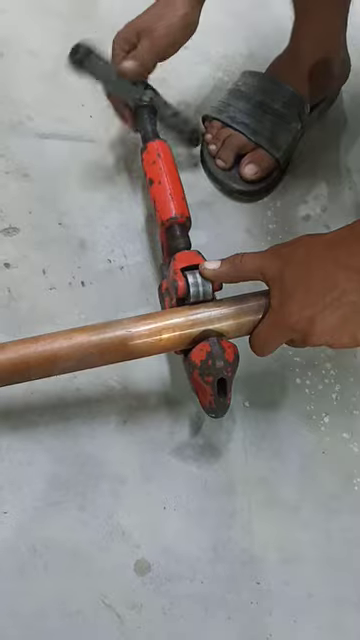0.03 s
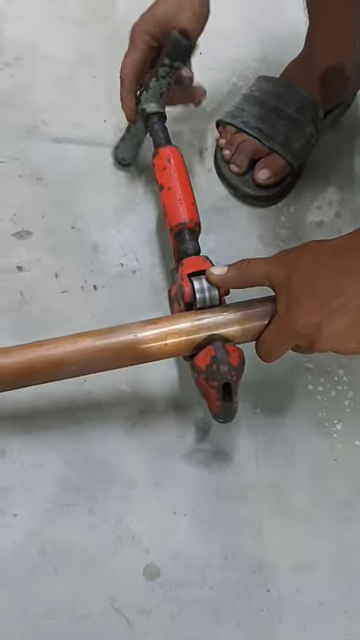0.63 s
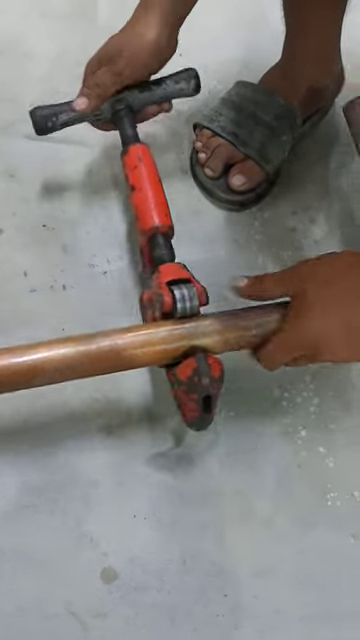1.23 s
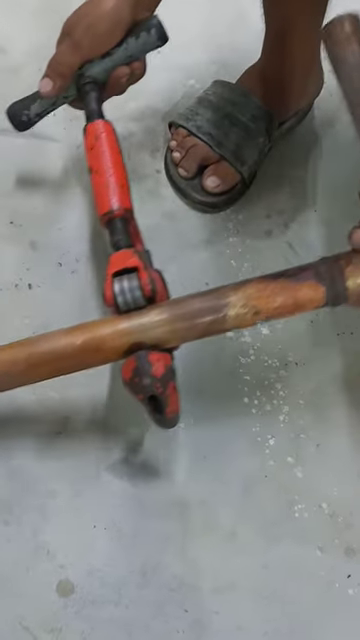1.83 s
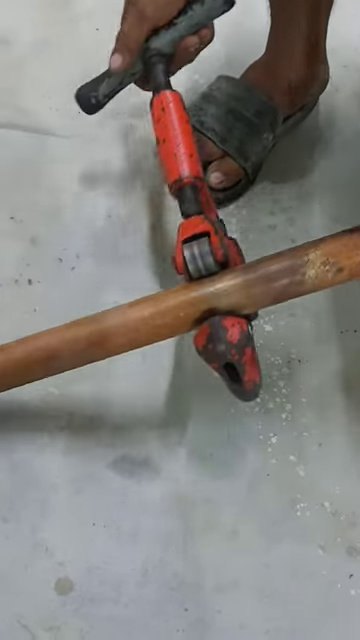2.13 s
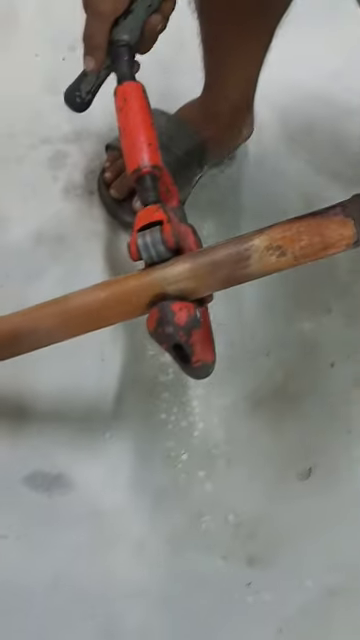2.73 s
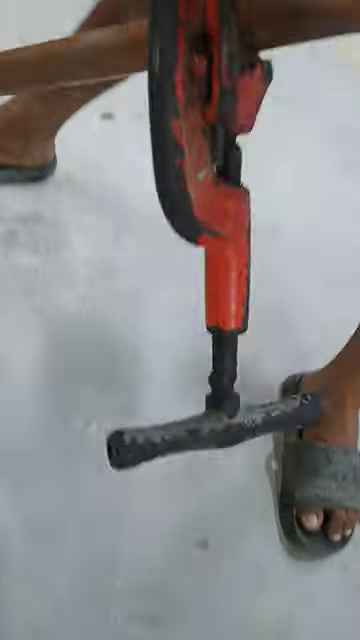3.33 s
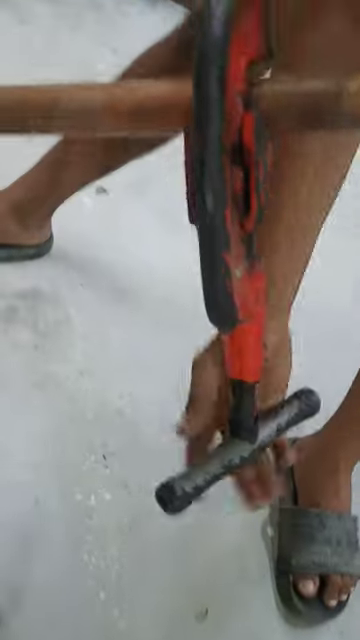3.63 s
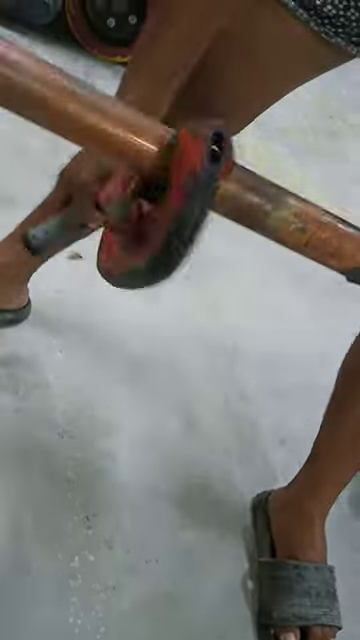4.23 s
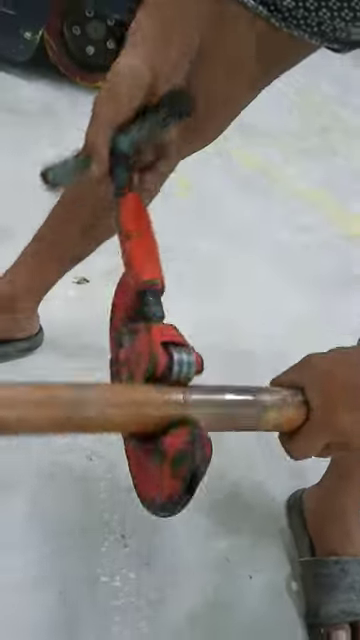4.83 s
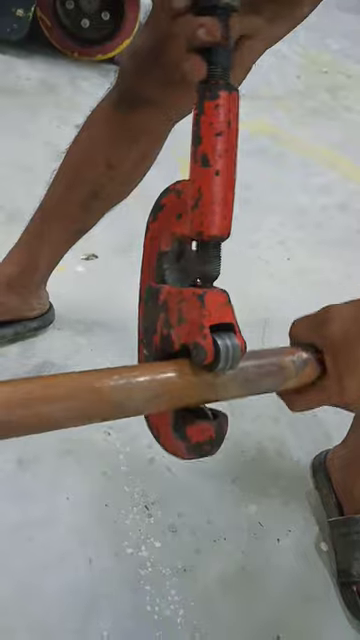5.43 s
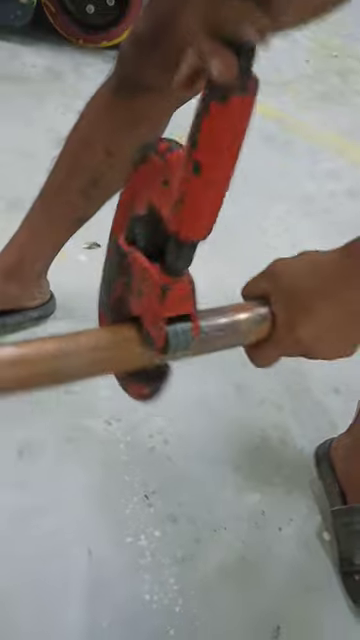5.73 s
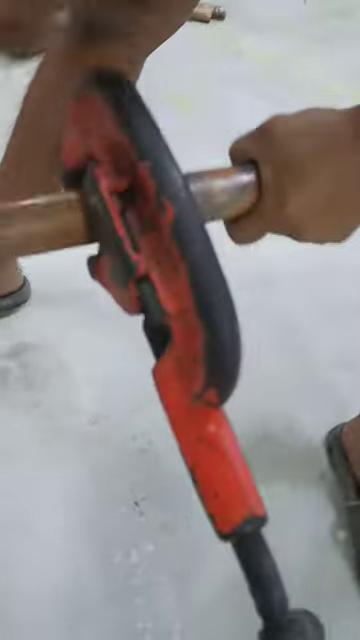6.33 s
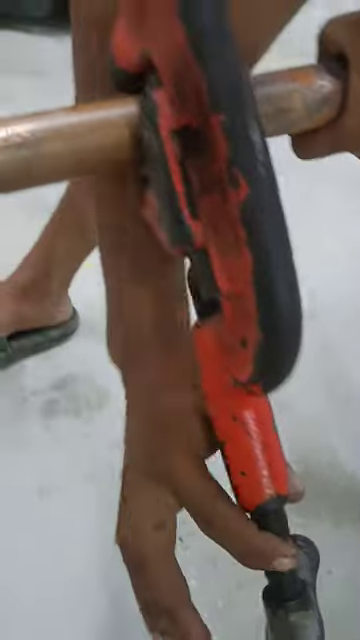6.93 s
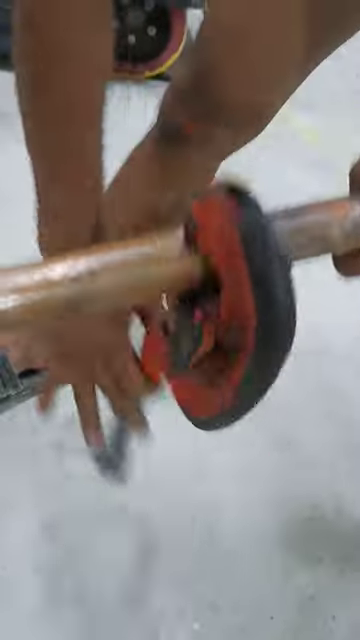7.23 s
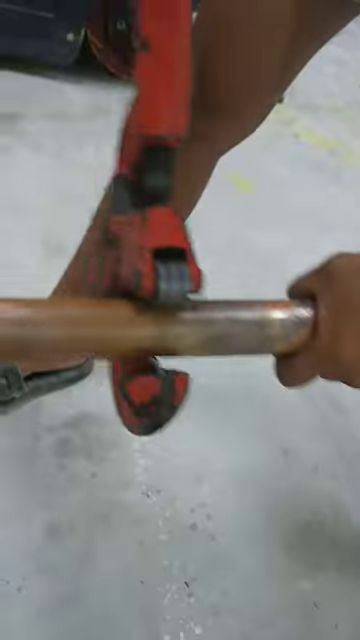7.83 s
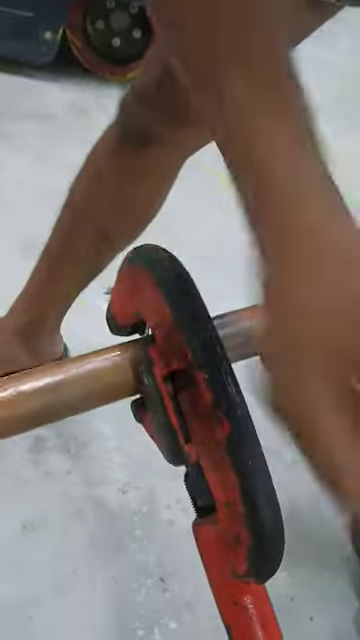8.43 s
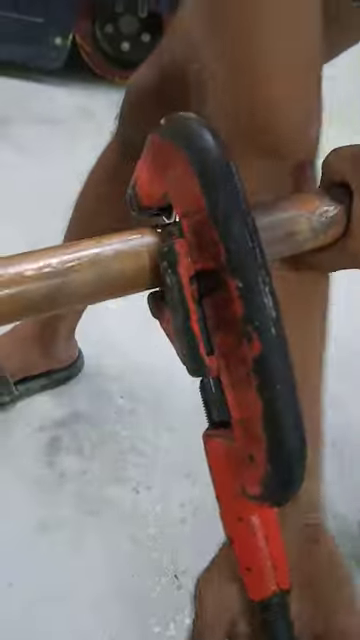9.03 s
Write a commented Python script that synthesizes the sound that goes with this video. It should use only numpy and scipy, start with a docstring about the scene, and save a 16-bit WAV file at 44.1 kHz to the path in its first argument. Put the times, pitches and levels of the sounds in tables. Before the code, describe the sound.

A low rumble of distant workshop machinery fades in under a thin hiss and continues throughout. Close by, the loose steel handle of a pipe cutter clinks at about 0.4 seconds, with two softer clinks by 0.7. After a faint scrape, the jaw knocks sharply on a copper pipe at 1.6 seconds, the loudest sound, ringing briefly with a small rebound. From about 1.9 to 3 seconds the cutter slides along the pipe in several weakening shoves, a bright, ringing scrape with thin squeaks near the end. At 3.4 seconds the hiss drops and a faint whine stops. From there until about 9 seconds, faint gritty roller scrapes come and go among dry ticks and soft brushes of a hand on the tool, a little stronger around 4.5 and 5.8 seconds. Tiny high squeaks come near 4.1 and 7.8 seconds.

```python
"""A hand pipe cutter knocks on a copper pipe and slides along it, so that the wall rings.
Before that, its loose handle clinks as the feed screw is spun. Faint roller scrapes and thin
stick-slip squeaks of the wheel come now and then, mostly after the slide, with ticks and
hand brushes. Workshop machinery rumbles behind, under a thin hiss."""
import sys
import numpy as np
from scipy import signal
from scipy.fft import rfft, irfft, next_fast_len
from scipy.io import wavfile
from scipy.ndimage import uniform_filter1d

SR = 44100
rng = np.random.default_rng(int(sys.argv[2]) if len(sys.argv) > 2 else 0)


def dump(signal):
    """Clip the signal to [-1, 1] and save it as 16-bit WAV at the path in sys.argv[1]."""
    limited = np.clip(np.atleast_2d(signal).T, -1, 1)
    pcm = np.round(limited * 32767).astype(np.int16)
    wavfile.write(sys.argv[1], SR, pcm)


N = 399987
TIME = np.arange(N) / SR


# strongest pipe modes: (frequency [Hz], knocked level [dB], rubbed level [dB], t60 [s])
PIPE_MODES = [(625, -17, -40, .15), (1386, -10, -28, .18), (2326, -18, -36, .55), (2600, -25, -19, .1),
              (2880, -26, -17.5, .12), (3112, -11, -19.5, .25), (3820, -20, -30, .3), (4790, -19, -19, .1),
              (5220, -26, -20, .12), (5770, -15, -21, .09), (6504, -15, -23, .85), (6730, -22, -21, .4),
              (6968, -18, -21, .36), (7192, -19, -15, .3), (7295, -22, -17, .4), (7580, -22, -22, .4),
              (8036, -28, -18, .2), (8269, -22, -19, .25), (9030, -26, -16, .06), (12566, -31, -27, .4),
              (12770, -29, -22, .3), (13048, -30, -20, .4), (13389, -30, -22, .2), (13870, -29, -16, .1),
              (14369, -31, -14, .2), (14430, -30, -12, .12), (15045, -32, -10, .2), (15075, -32, -11, .2),
              (15138, -30, -18, .2)]
# dense wall modes, families from about 2.3, 6.5 and 12.4 kHz: (frequency [Hz], level [dB])
WALL_SPECTRUM = [(1000, -10), (2250, -8), (2600, -1), (4900, 3), (6400, -14), (6560, 9), (7300, 9),
                 (8300, 6), (9600, -9), (11200, -11), (12200, -15), (12600, -1), (14200, -6), (15400, -2.5)]
# crack of jaw on pipe: (frequency [Hz], level [dB])
KNOCK_SPECTRUM = [(400, -7), (650, 13), (1000, -17), (1380, 4), (1900, -10), (3100, 6), (4800, 1),
                  (5900, -11), (7300, 0), (10000, -13), (13500, -16), (15500, 2.5)]
# jaw knocks: (time [s], ring level [dB], crack level [dB])
KNOCKS = [(1.5965, 3, 3), (1.5992, -1, 4), (1.604, -6, -3), (1.7215, -14, -8.5)]

def jaw_knocks():
    """The jaw strikes and rebounds; the pipe rings freely."""
    modes = ringing([(hz, knocked_db, t60_s) for hz, knocked_db, _, t60_s in PIPE_MODES])
    body = energy_one(modes + from_db(-1) * burst(WALL_SPECTRUM, t60_s=0.12))
    return blows(KNOCKS, body, KNOCK_SPECTRUM, crack_t60_s=0.039, room_db=-8.5, room_t60_s=0.82)


# shoves along the pipe: (time of top speed [s], length [s], level [dB])
SHOVES = [(2.06, 0.29, -27), (2.186, 0.24, -32), (2.365, 0.13, -31.5), (2.51, 0.15, -35.5),
          (2.867, 0.16, -36.5)]

def jaw_slide(travel_hz=2.4, split_hz=10500, low_exponent=0.97):
    """Slips ring the pipe; its high and low modes swell together with each shove."""
    slips = friction(slips_per_s=1200, spread_db=3.5, judder_db=1.9, judder_hz=78)
    modes = ringing([(hz, rubbed_db, t60_s) for hz, _, rubbed_db, t60_s in PIPE_MODES])
    wall = signal.fftconvolve(slips, modes)[:N] + from_db(-16) * coloured(slips, WALL_SPECTRUM)
    # the moving contact drives two sets of wall modes in turn
    travel_rad = 2 * np.pi * TIME * travel_hz
    for share in (np.cos(travel_rad), np.sin(travel_rad)):
        mode_set = burst(WALL_SPECTRUM, t60_s=0.12)
        wall += from_db(4) * signal.fftconvolve(slips * share, mode_set)[:N]
    high = filtered(wall, lambda hz: 1 / (1 + (split_hz / hz) ** 16))
    low = wall - high
    speed = sum(from_db(db) * swell(time_s, length_s) for time_s, length_s, db in SHOVES)
    return from_db(-3) * speed * rms_one(high) + from_db(-7.5) * speed ** low_exponent * rms_one(low)


# steel screw and handle modes: (frequency [Hz], level [dB], t60 [s])
SCREW_MODES = [(1400, -14, .04), (1906, -17, .1), (2550, -8, .06), (3730, -6, .15), (3790, -4, .35),
               (3842, -2, .85), (3890, -4, .3), (4700, -17, .08), (6885, -18, .2), (8694, -22, .35),
               (8888, -17, .35)]
# crack of handle on screw: (frequency [Hz], level [dB])
CLINK_SPECTRUM = [(700, -18), (1400, -1), (1900, 2), (2600, -1), (3150, -2), (4500, 1), (6000, -12),
                  (8700, -8), (10500, -56), (15000, -32)]
# handle clinks: (time [s], ring level [dB], crack level [dB])
CLINKS = [(.3605, -2, -2.5), (.3635, -7, -9), (.452, -12.5, -31), (.7005, -12, -23)]

def feed_screw():
    """The loose handle clinks as the feed screw is spun."""
    body = ringing(SCREW_MODES)
    return blows(CLINKS, body, CLINK_SPECTRUM, crack_t60_s=0.033, room_db=-6.5, room_t60_s=0.34)


# roller scrape: (frequency [Hz], level [dB])
SCRAPE_SPECTRUM = [(2500, -18), (4200, -1), (5800, -4.5), (7200, 4.5), (8600, -8), (10000, -7),
                   (12000, -3.5), (13800, 1.5), (15500, 0)]
# pushes round the pipe: (start [s], length [s], end level [dB])
PUSHES = [(1.323, .26, -48.5), (2.95, 0.13, -57), (3.684, 0.022, -49), (3.745, 0.22, -62),
          (4.12, 0.16, -60), (4.31, .29, -47), (4.62, 0.15, -61), (4.834, 0.29, -56.5), (5.334, .07, -58),
          (5.468, 0.16, -56.5), (5.734, 0.2, -50.5), (5.94, 0.11, -58), (6.13, 0.11, -59.5),
          (6.406, 0.072, -59), (6.87, 0.055, -60), (6.97, .08, -69), (7.3, .13, -65), (7.54, 0.26, -59.5),
          (8.03, 0.12, -57), (8.213, 0.18, -55), (8.68, .04, -68)]

def roller_scrape(attack_s=0.0087, build_db=4.5, release_s=0.024):
    """Fine grit on the hand-damped pipe; each push takes hold, builds and lets go."""
    slips = friction(slips_per_s=5000, spread_db=3.1, judder_db=2.1, judder_hz=110)
    force, age_s = np.zeros(N), TIME[:SR]
    for start_s, length_s, db in PUSHES:
        attack = 1 - np.exp(-age_s / attack_s)
        build = from_db(build_db * (np.minimum(age_s / length_s, 1) - 1))
        release = np.exp(-np.maximum(age_s - length_s, 0) / release_s)
        add(force, start_s, from_db(db) * attack * build * release)
    return force * coloured(slips, SCRAPE_SPECTRUM)


# roller ticks: (time [s], relative level [dB], centre [Hz])
TICKS = [(3.6979, -40, 13400), (4.0557, -50, 7410), (4.1165, -37, 13200), (4.2427, -40, 7000),
         (5.217, -39, 7210), (5.9394, -36, 9140), (6.3559, -39, 6960), (6.4554, -33, 5970),
         (6.665, -52, 13500), (6.759, -49, 14000), (6.8847, -39, 14300), (6.9164, -43, 7310),
         (7.1442, -43, 14600), (8.3944, -34, 14400), (9.007, -43, 6870)]

def roller_ticks(gain_db=8.5):
    """Loose rollers give dry ticks, each around its own pitch."""
    out = np.zeros(N)
    for time_s, db, centre_hz in TICKS:
        add(out, time_s, from_db(db + gain_db) * burst(band(centre_hz, skirt_db=-11), t60_s=0.02))
    return out


# squeaks: (start [s], length [s], pitch at both ends [Hz], top pitch [Hz], relative level [dB])
SQUEAKS = [(2.57, 0.097, 12150, 12350, -59), (2.672, .035, 13300, 13650, -63),
           (2.72, .085, 12300, 13700, -58), (4.134, 0.011, 5700, 6360, -42),
           (7.795, .07, 11600, 13300, -57), (7.785, .09, 13300, 15600, -59), (7.86, .07, 12100, 12900, -59)]

def wheel_squeaks(waver_depth=0.006, flutter_db=3, gain_db=-6):
    """Stick and slip: pitch rises and falls with the speed of the wheel, whose grip flutters."""
    out = np.zeros(N)
    waver = 1 + waver_depth * drift(rate_hz=300)
    for start_s, length_s, end_hz, top_hz, db in SQUEAKS:
        arch = np.sin(np.pi * np.clip((TIME - start_s) / length_s, 0, 1)) ** 2
        pitch_hz = (end_hz + (top_hz - end_hz) * arch) * waver
        out += from_db(db) * arch ** 0.25 * np.sin(2 * np.pi * np.cumsum(pitch_hz) / SR)
    return out * from_db(gain_db + flutter_db * drift(rate_hz=120))


# hand brushes: (mid time [s], length [s], centre [Hz], level [dB])
BRUSHES = [(3.364, 0.013, 4550, -47), (4.356, 0.1, 6300, -56.5), (5.862, 0.14, 3370, -52.5),
           (7.737, 0.056, 7660, -59), (8.136, 0.087, 6500, -61), (8.203, 0.049, 5700, -58)]

def hand_brushes():
    """Skin rubs the tool in short grainy swells."""
    out = np.zeros(N)
    for time_s, length_s, centre_hz, db in BRUSHES:
        slips = friction(slips_per_s=6800, spread_db=3, judder_db=-0.5, judder_hz=130)
        grain = coloured(slips, band(centre_hz, skirt_db=-13))
        out += from_db(db) * swell(time_s, length_s, exponent=4) * grain
    return out


# machine drones: (centre [Hz], half-width [Hz], relative level [dB])
DRONES = [(106.77, 5.5, -32.5), (134.7, 5.7, -34), (166.84, 2.1, -36.5), (272, 11, -40), (396, 34.3, -36.5),
          (609, 41, -43.5), (802, 38, -52)]
# machine rumble: (frequency [Hz], level [dB])
RUMBLE_SPECTRUM = [(20, -43), (42, -33), (58, -18), (76, -14), (100, -3.5), (160, -5), (290, -5),
                   (320, -10.5), (430, -12.5), (530, -17.5), (680, -18.5), (900, -22.5), (1150, -36.5),
                   (2200, -57)]

def machinery():
    """Distant machines rumble with narrow, wavering drones, swelling once by 1 dB."""
    def resonances(hz):
        return sum(from_db(db) * rms_one(1 / (1 + ((hz - centre_hz) / half_width_hz) ** 2))
                   for centre_hz, half_width_hz, db in DRONES)
    drones = filtered(rng.standard_normal(N), resonances)
    rumble = from_db(-27.5) * noise(RUMBLE_SPECTRUM)
    level_db = swell(time_s=1.56, length_s=0.93) - 1
    return from_db(level_db) * (drones + rumble)


# room air: (frequency [Hz], level [dB])
AIR_SPECTRUM = [(900, 1.5), (1700, 1.5), (2200, -5), (2800, -3.5), (3300, -8.5), (4900, -7), (5700, -15),
                (7300, -13.5), (8500, -21), (9800, -27.5), (12500, -23.5), (13900, -22), (15500, -23)]
# brighter hiss: (frequency [Hz], level [dB])
HISS_SPECTRUM = [(1000, 3.5), (1700, 3), (2200, -1.5), (3500, 0.5), (5000, -1.5), (5900, -10), (7400, -4),
                 (8600, -9), (10000, -20), (12000, -19.5), (14000, -16), (15500, -17)]

def workshop_air(whine_hz=1163, hiss_end_s=3.372):
    """Steady air noise; a brighter hiss and a faint whine stop together partway through."""
    air = from_db(-53) * noise(AIR_SPECTRUM)
    hiss = from_db(-50.5) * noise(HISS_SPECTRUM)
    whine = from_db(-58.5) * np.sin(2 * np.pi * whine_hz * TIME)
    return air + (hiss + whine) * (TIME < hiss_end_s)


def blows(hits, body, spectrum, crack_t60_s, room_db, room_t60_s):
    """Each blow cracks, rings the body and leaves a tail in the room."""
    out = np.zeros(N)
    for time_s, ring_db, crack_db in hits:
        crack = burst(spectrum, crack_t60_s)
        tail = from_db(room_db) * burst(spectrum, room_t60_s)
        add(out, time_s, from_db(ring_db) * body + from_db(crack_db) * (crack + tail))
    return out


def friction(slips_per_s, spread_db, judder_db, judder_hz):
    """Tiny slips of uneven size, bunched by the judder of the contact; rms 1."""
    sizes = from_db(spread_db * np.minimum(rng.exponential(1, N), 4))
    signs = rng.choice([-1, 1], N)
    slipping = rng.random(N) < slips_per_s / SR
    judder = from_db(judder_db * drift(judder_hz))
    return rms_one(sizes * signs * slipping * judder)


def ringing(modes):
    """Impulse response of separate modes, alternating in sign; energy 1."""
    out = np.zeros(SR)
    for k, (hz, db, t60_s) in enumerate(modes):
        mode = decay(t60_s) * np.sin(2 * np.pi * hz * TIME[:SR])
        out += (-1) ** k * from_db(db) * energy_one(mode)
    return energy_one(out)


def burst(spectrum, t60_s):
    """Impulse response of many close modes; energy 1."""
    return energy_one(coloured(rng.standard_normal(SR), spectrum) * decay(t60_s))


def decay(t60_s):
    """One second of exponential decay."""
    return np.exp(-np.log(1000) * TIME[:SR] / t60_s)


def swell(time_s, length_s, exponent=2):
    """Bell envelope; a higher exponent flattens the top."""
    return np.exp(-(2 * (TIME - time_s) / length_s) ** exponent)


def drift(rate_hz):
    """Low-passed random wander; rms 1."""
    return rms_one(filtered(rng.standard_normal(N), lambda hz: 1 / (1 + (hz / rate_hz) ** 2)))


def noise(spectrum):
    """Steady shaped noise; rms 1."""
    return coloured(rng.standard_normal(N), spectrum)


def band(centre_hz, skirt_db):
    """Peaked spectrum, at skirt_db an octave to either side."""
    return [(centre_hz / 2, skirt_db), (centre_hz, 0), (centre_hz * 2, skirt_db)]


def coloured(x, spectrum):
    """Shape x by a spectrum, rolled off beyond its ends; rms 1."""
    points_hz, points_db = np.transpose(spectrum)
    def gain_at(hz):
        skirts = 1 / np.sqrt(1 + (points_hz[0] / (2 * hz)) ** 6 + (hz / (1.5 * points_hz[-1])) ** 8)
        return skirts * from_db(np.interp(np.log(hz), np.log(points_hz), points_db))
    return rms_one(filtered(x, gain_at))


def filtered(x, gain_at):
    """Apply a frequency-dependent gain."""
    size = next_fast_len(len(x))
    hz = np.maximum(np.arange(size // 2 + 1) * SR / size, 1)
    return irfft(rfft(x, size) * gain_at(hz), size)[:len(x)]


def add(out, time_s, sound):
    """Mix a sound in at time_s."""
    start = int(np.clip(round(time_s * SR), 0, N - 1))
    out[start:start + len(sound)] += sound[:N - start]


def from_db(db):
    """Decibels to gain."""
    return 10 ** (np.asarray(db) / 20)


def rms_one(x):
    """Scale to rms 1."""
    return x / np.sqrt(np.mean(x ** 2) + 1e-20)


def energy_one(x):
    """Scale to energy 1."""
    return x / np.sqrt(np.sum(x ** 2) + 1e-20)


def scene():
    """Cutter and pipe close by, workshop behind; mono."""
    metal = feed_screw() + jaw_knocks() + jaw_slide()
    handling = roller_scrape() + hand_brushes() + roller_ticks() + wheel_squeaks()
    return (metal + handling + machinery() + workshop_air())[None]


# brief gaps in the sound: (start [s], end [s])
DROPOUTS = [(3.370, 3.374), (5.783, 5.795)]

def record(dry):
    """The sound fades in, drops out twice for an instant and is steeply low-passed."""
    fade_start_s, fade_length_s, fade_exponent = 0.073, 0.33, 0.84
    output_db, cutoff_hz = 2.5, 15490
    gain = from_db(output_db) * np.clip((TIME - fade_start_s) / fade_length_s, 0, 1) ** fade_exponent
    for start_s, end_s in DROPOUTS:
        gap = (TIME > start_s) & (TIME < end_s)
        gain *= 1 - uniform_filter1d(gap.astype(float), size=24)
    return filtered(dry[0] * gain, lambda hz: 1 / np.sqrt(1 + (hz / cutoff_hz) ** 600))[None]


dry = scene()
out = record(dry)
dump(out)
```